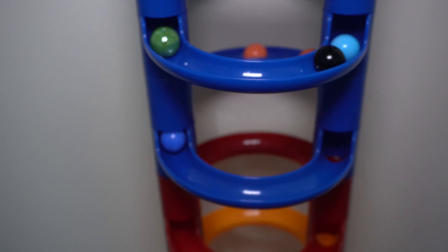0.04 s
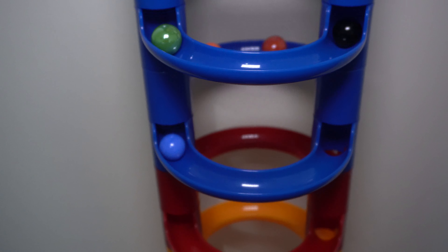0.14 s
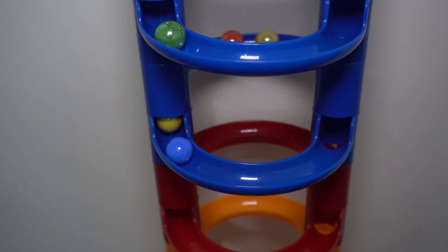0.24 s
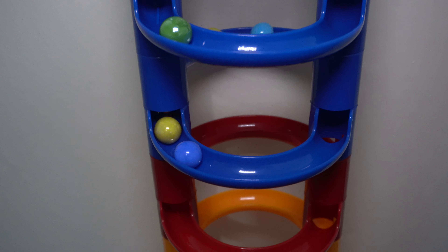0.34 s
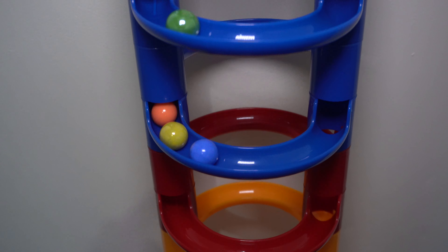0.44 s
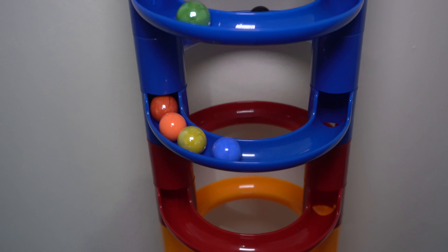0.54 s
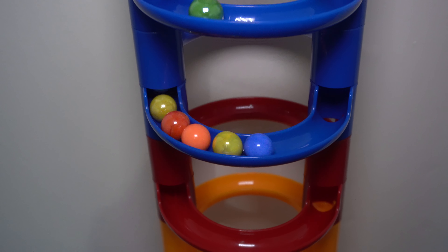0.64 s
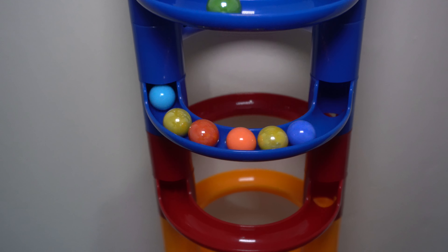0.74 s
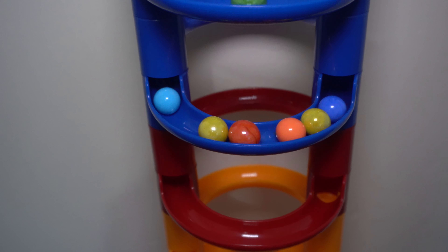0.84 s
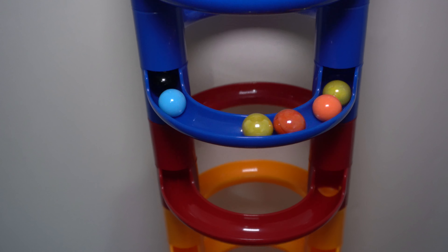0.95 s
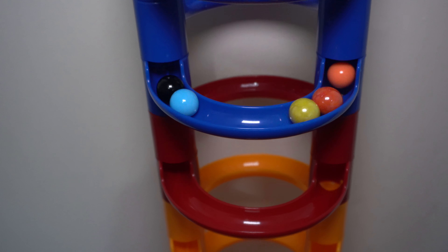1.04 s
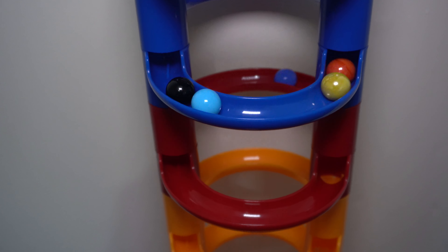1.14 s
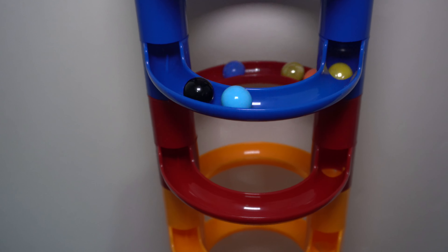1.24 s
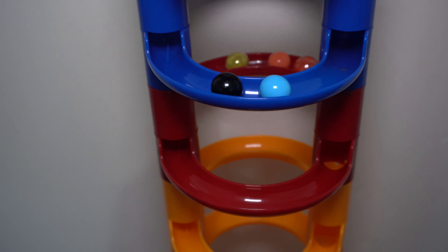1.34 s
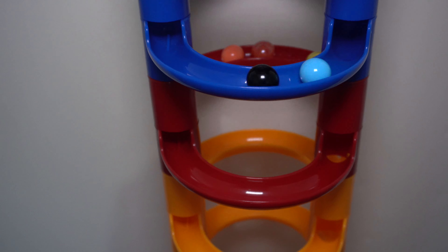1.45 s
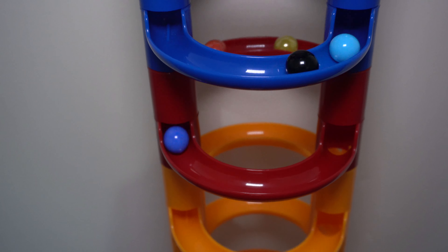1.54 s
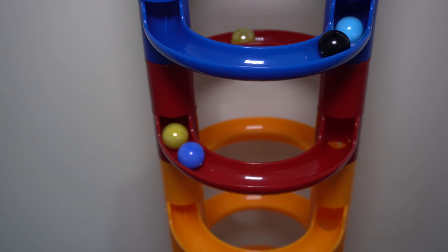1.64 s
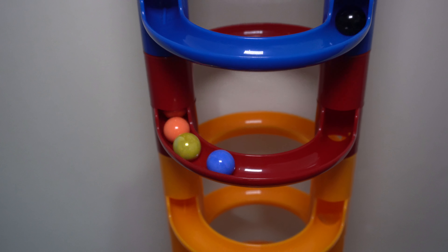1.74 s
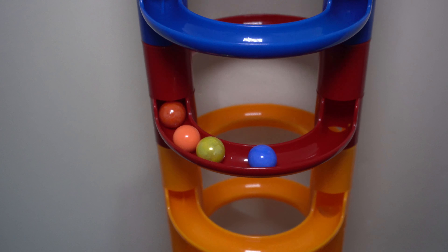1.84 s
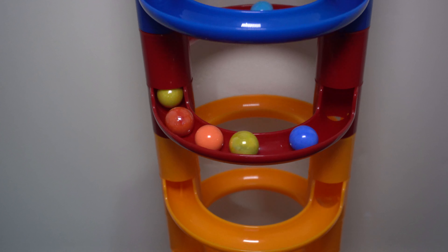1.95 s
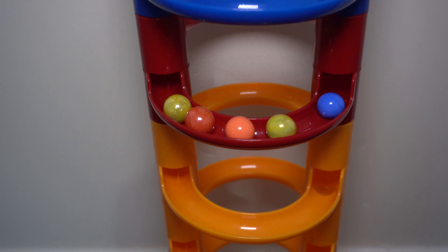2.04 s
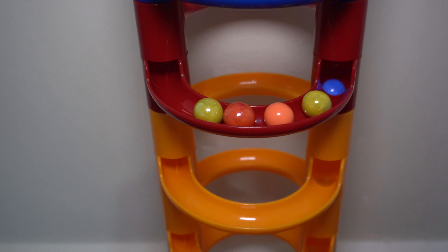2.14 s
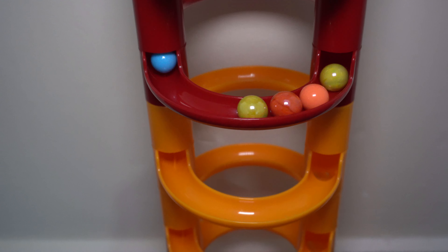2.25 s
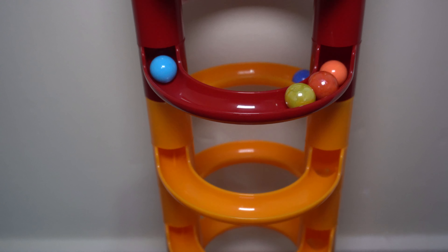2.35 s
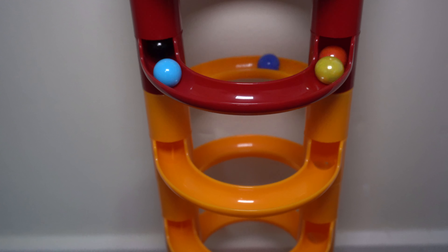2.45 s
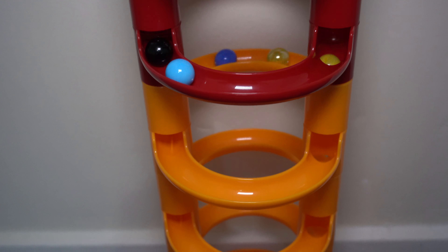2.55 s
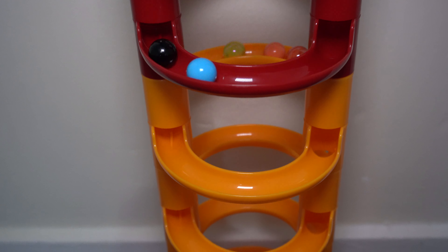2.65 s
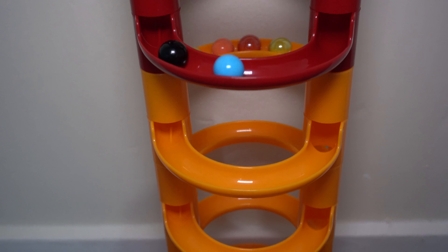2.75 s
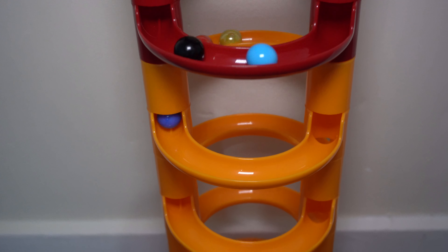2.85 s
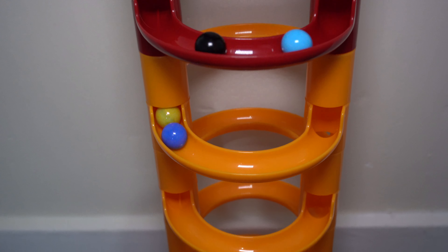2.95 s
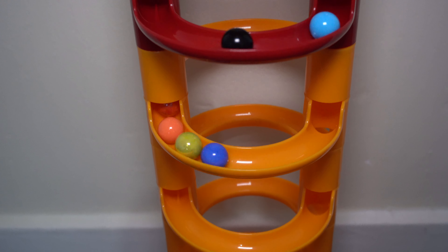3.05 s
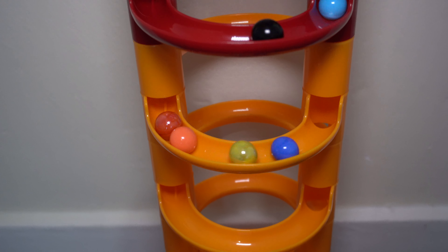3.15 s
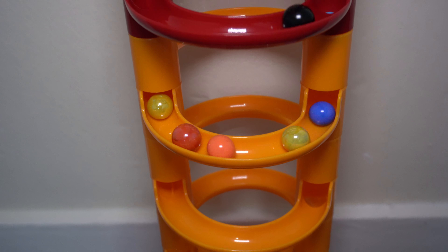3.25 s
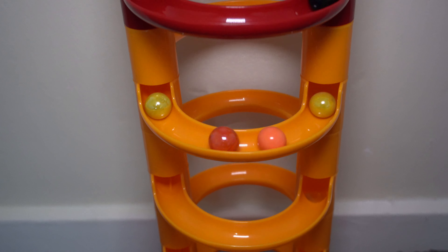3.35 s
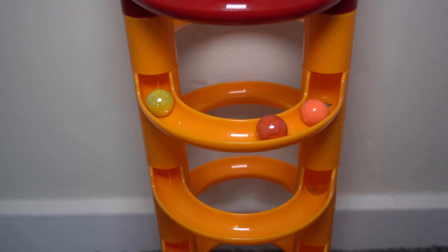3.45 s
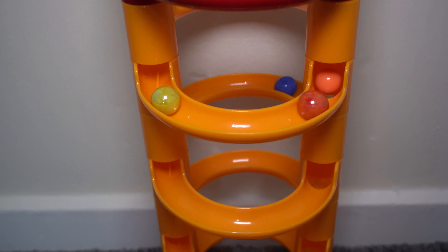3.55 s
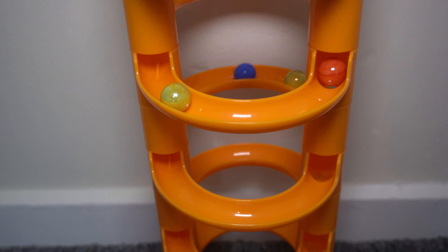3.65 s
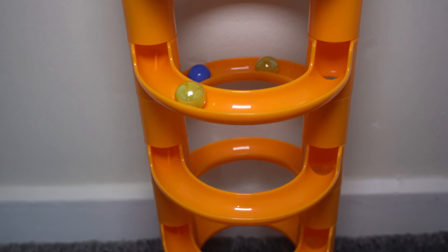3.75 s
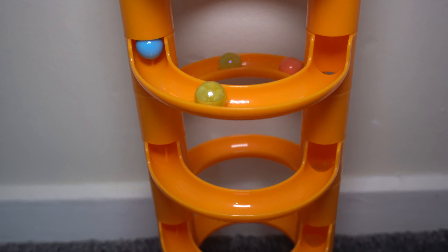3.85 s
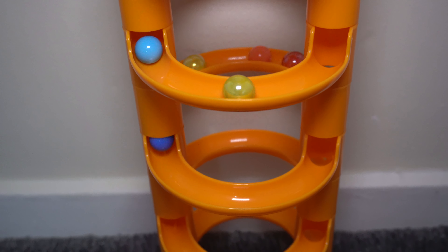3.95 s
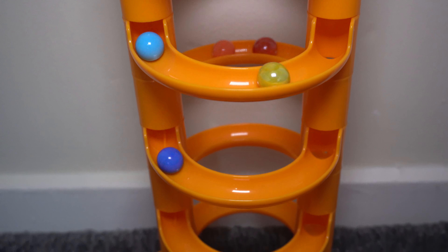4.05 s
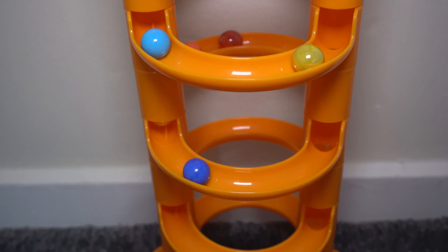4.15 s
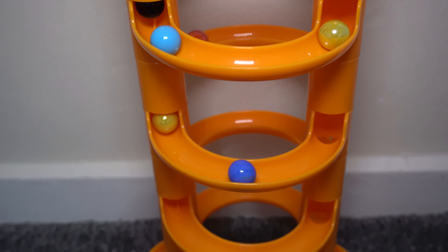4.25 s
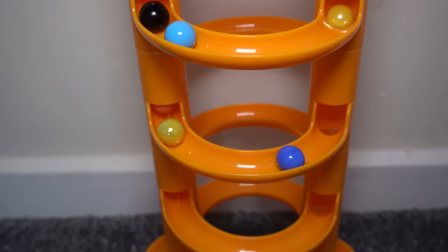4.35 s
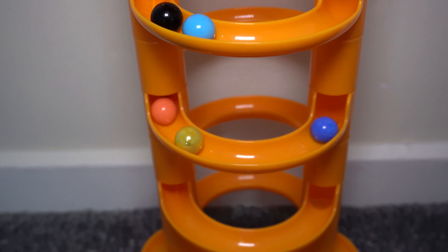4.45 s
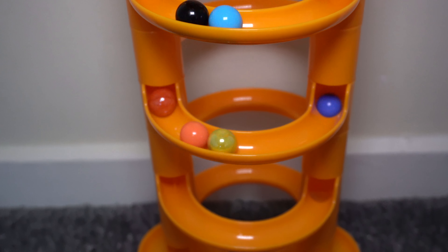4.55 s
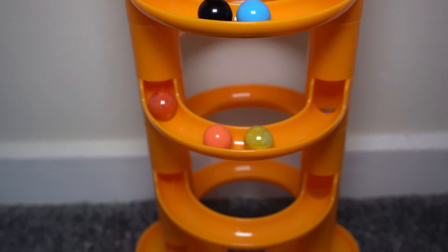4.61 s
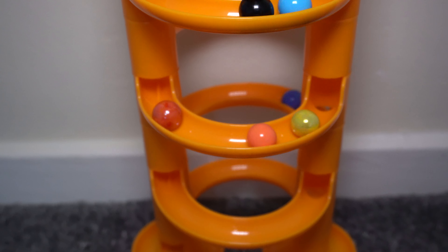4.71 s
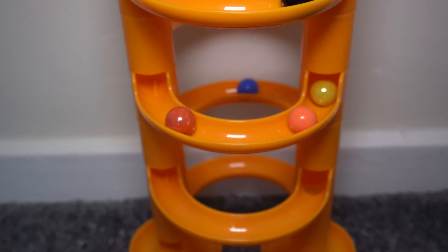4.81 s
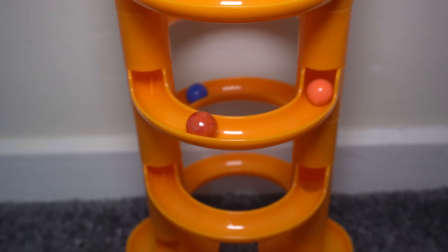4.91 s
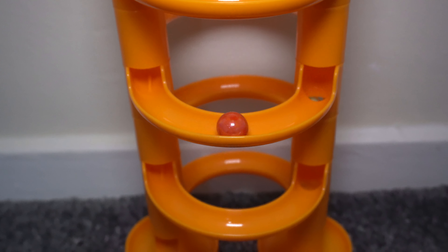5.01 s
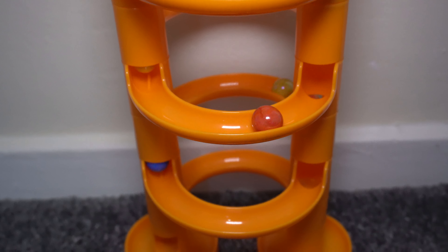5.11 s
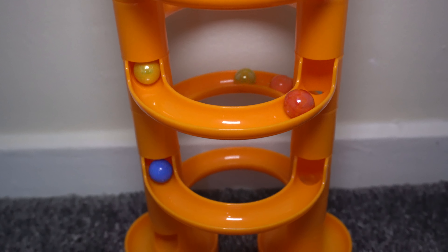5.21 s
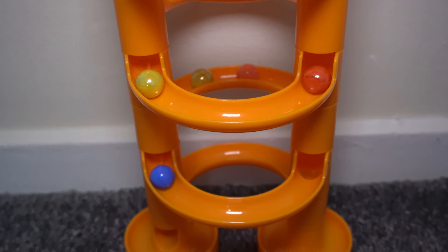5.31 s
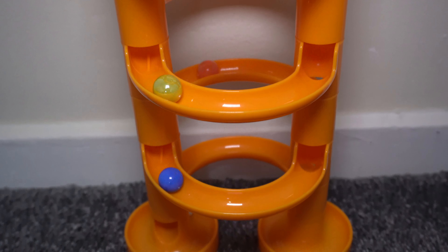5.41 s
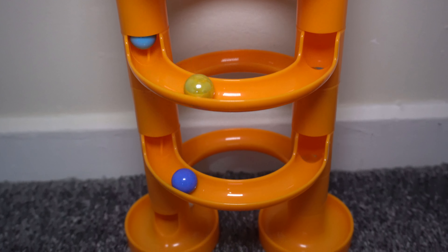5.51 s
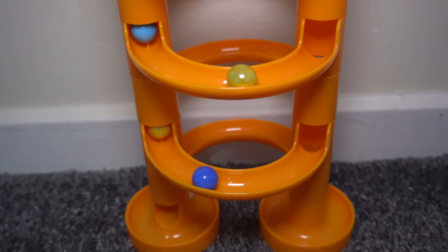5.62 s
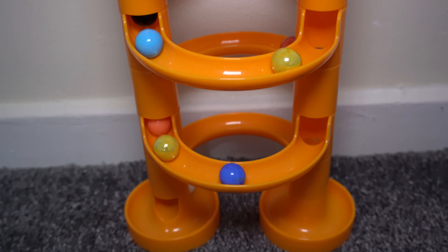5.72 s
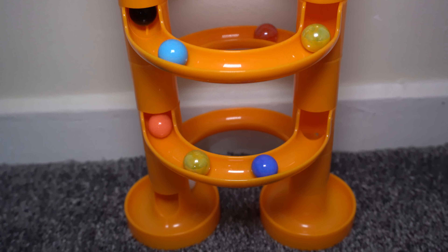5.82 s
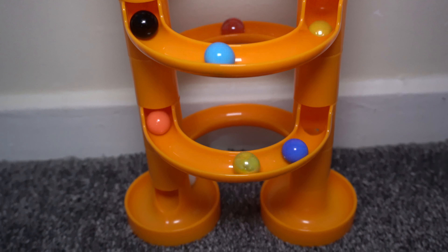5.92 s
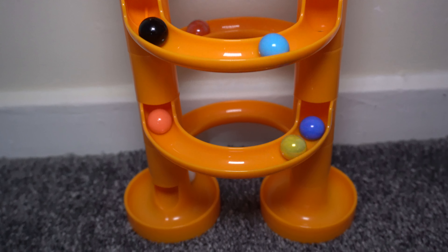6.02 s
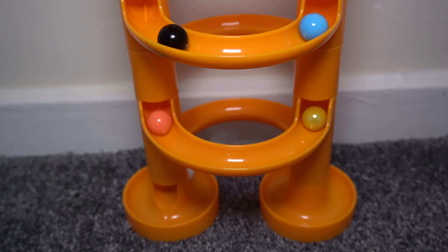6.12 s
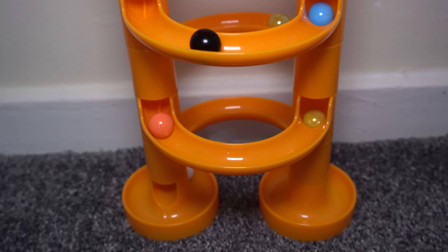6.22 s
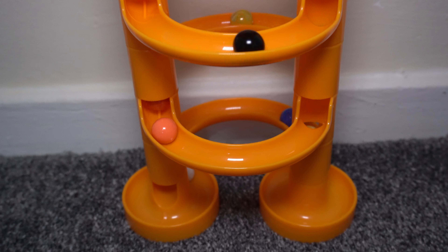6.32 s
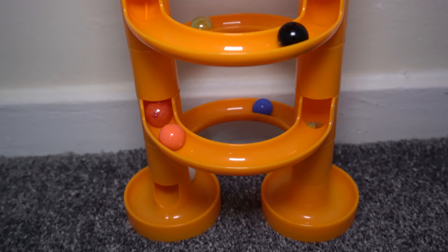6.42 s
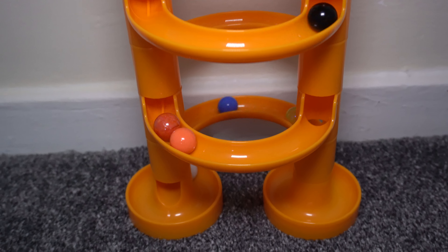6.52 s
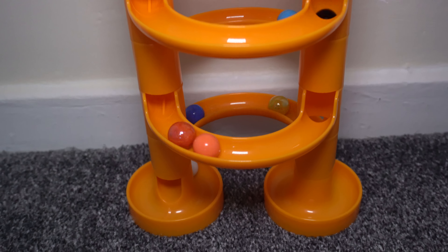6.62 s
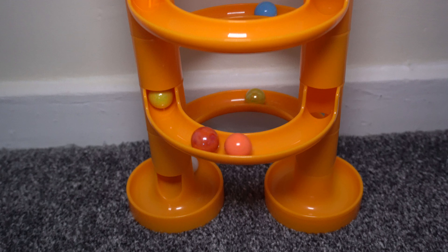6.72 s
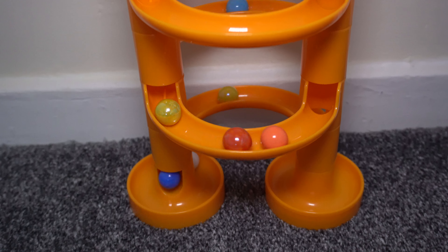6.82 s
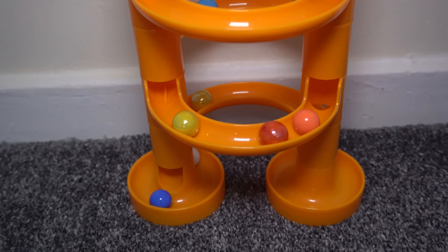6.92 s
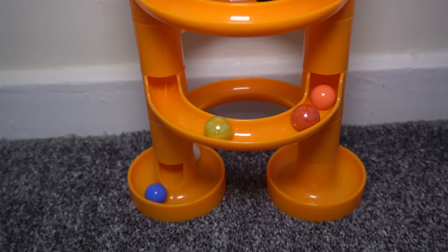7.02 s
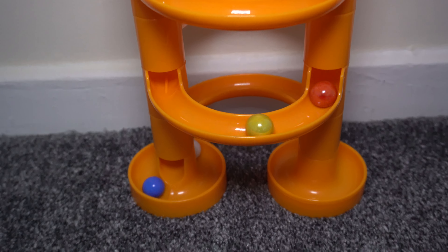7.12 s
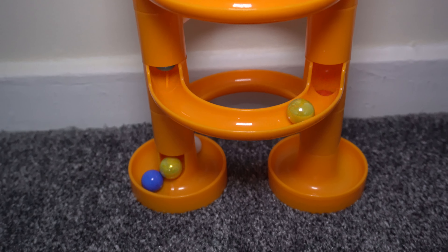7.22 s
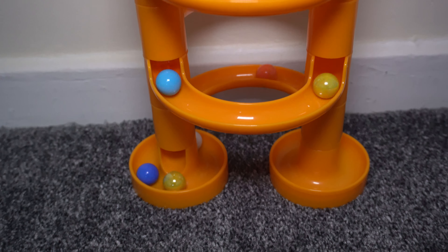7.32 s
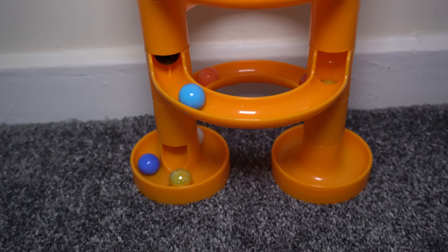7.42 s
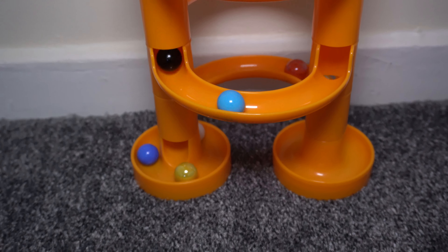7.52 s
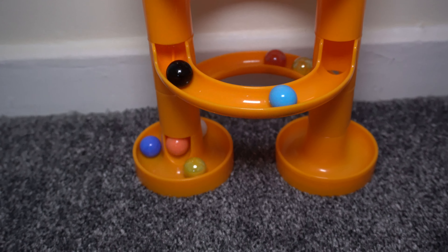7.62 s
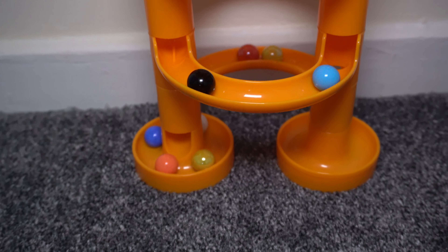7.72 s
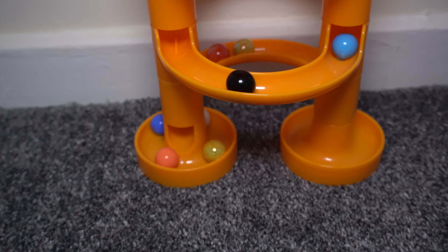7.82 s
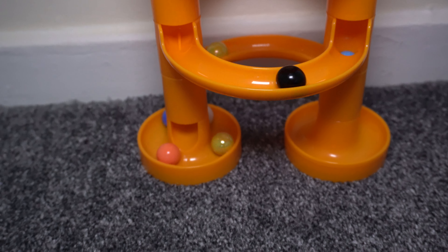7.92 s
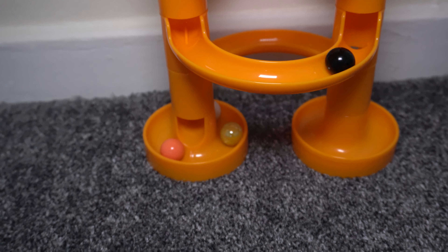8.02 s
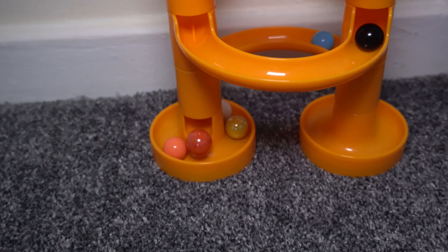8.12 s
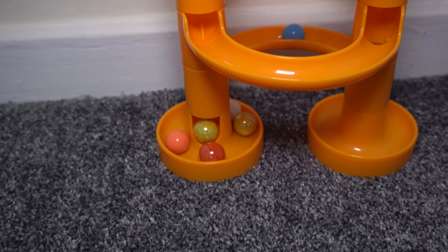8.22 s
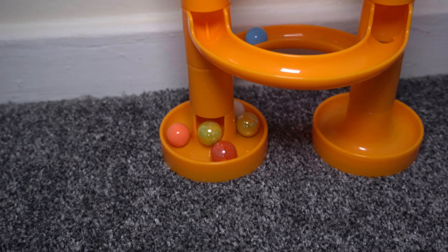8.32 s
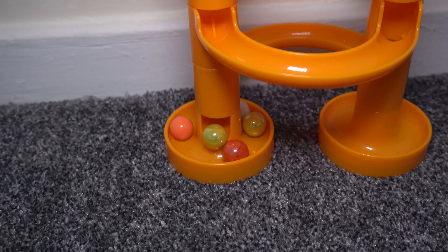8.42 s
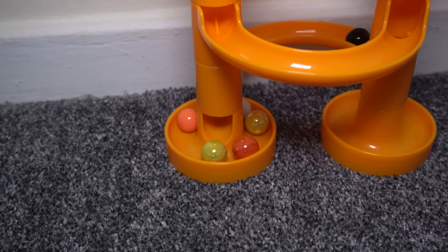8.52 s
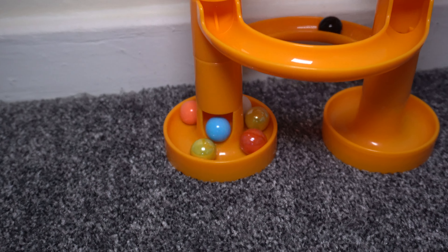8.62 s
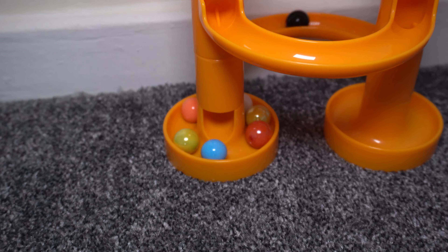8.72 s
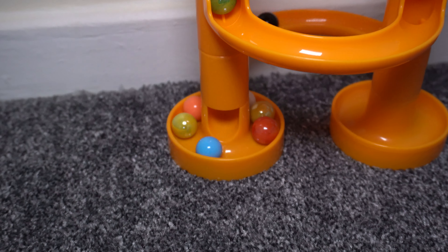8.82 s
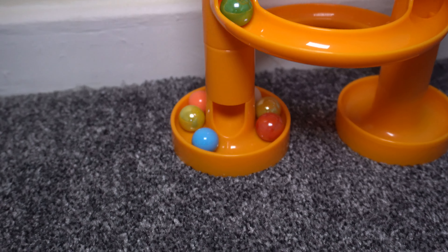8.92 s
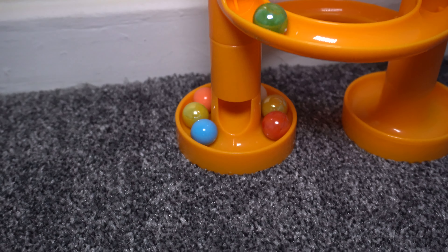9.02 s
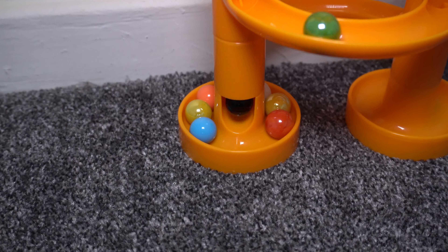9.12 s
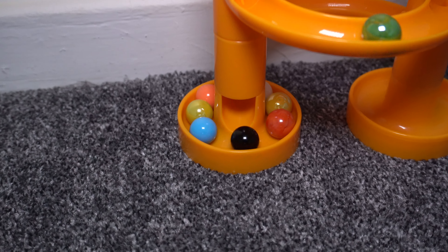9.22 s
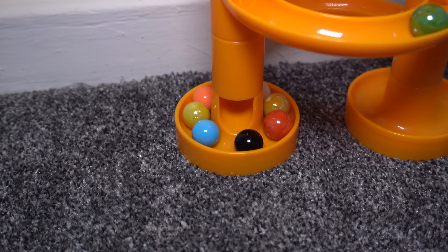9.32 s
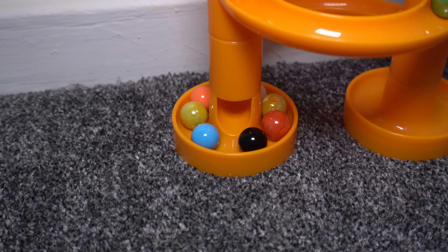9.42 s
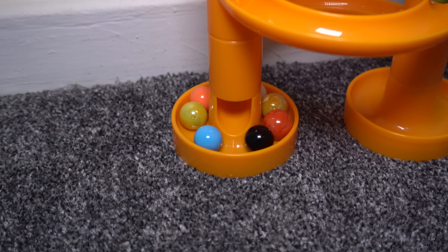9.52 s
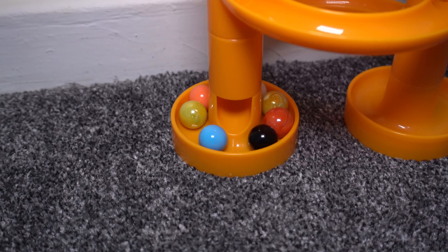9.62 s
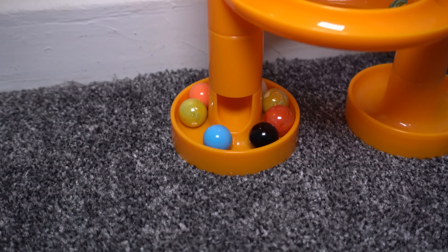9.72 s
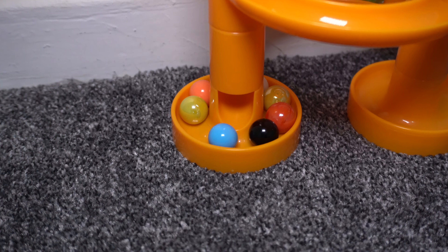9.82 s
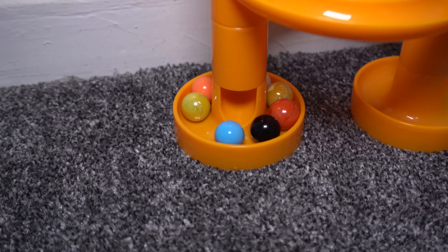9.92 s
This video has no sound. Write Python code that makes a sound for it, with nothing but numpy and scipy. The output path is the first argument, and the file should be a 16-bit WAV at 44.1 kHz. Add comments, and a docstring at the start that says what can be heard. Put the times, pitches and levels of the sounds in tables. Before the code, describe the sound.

Rapid glassy ticks and plastic knocks tumble on as marbles roll down a toy tower of stacked rings, its hollow posts humming softly beneath the rattle. The clatter gradually loses brightness on the way down. Near the end the marbles drop into a cup with light thuds and clinks, leaving a few scattered clicks. The small room adds a short echo and a faint low murmur of air.

```python
"""Glass marbles run down a stack of plastic rings in a small carpeted room. From the start they
knock against the track and each other, each impact exciting the modes of the plastic and a glassy tick.
Between knocks they roll with a rattle, and the air in the hollow posts hums. As they descend, the hum
deepens and the knocks grow duller; from about 7 s they thud and clink into a cup. Throughout, the room
echoes over a low murmur of air, and a limiter holds the peaks."""
import sys
import numpy as np
from scipy import signal
from scipy.fft import rfft, irfft
from scipy.io import wavfile
from scipy.ndimage import uniform_filter1d, minimum_filter1d

SR = 44100
rng = np.random.default_rng(int(sys.argv[2]) if len(sys.argv) > 2 else 0)


def transcribe(u):
    """Save the signal u as a 16-bit wav file named by the first command-line argument.

    u: samples, shape (n,) or (channels, n), limited to [-1, 1]; the rate is SR.
    q: integer samples, one column per channel.
    """
    v = np.clip(np.atleast_2d(u).T, -1, 1)
    q = np.round(v * 32767).astype(np.int16)
    wavfile.write(sys.argv[1], SR, q)


N = 439236

# impacts of the marbles: start_s, level_db, tick_re_blow_db
KNOCKS = [(0.0181, -1.5, -10), (0.03, -8, -3), (0.0433, -8, 2), (0.061, -3, -7), (0.0797, -20, -1),
          (0.093, -9, -7), (0.1033, -24, -7), (0.1117, -21, 5), (0.127, -4, -8), (0.138, -1, -5),
          (0.1463, -22, -4), (0.161, -16, 0), (0.1696, -5, -1.5), (0.215, -6, -2), (0.2305, -12, 4),
          (0.236, -8, -5), (0.2427, -11, 1), (0.251, -11, -3), (0.2573, -9, -7), (0.2661, -11, -1),
          (0.2929, -1, -9), (0.303, -4, -7), (0.3115, -18, 2), (0.3204, -20, 3), (0.3368, -19, -3),
          (0.3475, -3, -7), (0.3537, -4, -14), (0.3724, -23, 2), (0.383, -14, -3), (0.396, -8, 0),
          (0.408, -12, -4), (0.427, -3, -6), (0.4458, -12, 0), (0.468, -3.5, -3), (0.49, -10, -6),
          (0.504, -9, -3), (0.517, -7, -5), (0.5228, -12, 2), (0.5373, -2.5, -2), (0.571, -9, 0),
          (0.5887, -15, -3), (0.5977, -3, -3), (0.603, -18, 9), (0.6122, 4, -11), (0.6278, -7, 1),
          (0.6396, -2, -12), (0.653, -8, -1), (0.6614, -16, 4), (0.6784, -1, -2), (0.7122, -7, -5),
          (0.7182, -24, -9), (0.727, -0.5, -8), (0.7344, -20, -4), (0.7424, -18, 5), (0.7592, -23, -3),
          (0.7841, -2.5, -6), (0.7969, -7.5, -4), (0.8241, -12, -4), (0.8373, -10, -5), (0.856, -13, -4),
          (0.8697, -22, -7), (0.879, -31, -8), (0.9055, -2.5, -2), (0.9352, -1, -14), (0.941, -16.5, 6.5),
          (0.963, -19, -2), (0.986, -21, -4), (0.996, -6, -1), (1.025, 1, -3.5), (1.032, -6, -7),
          (1.0425, -13, -4), (1.0517, -7, -4), (1.0608, -10, 5), (1.0772, -7.5, 2.5), (1.092, -25, -5),
          (1.1124, -17, -1), (1.1258, -5, -5), (1.1402, -18, 8), (1.1505, -22, -4), (1.1746, -1.5, 1),
          (1.1823, -0.5, -18), (1.191, -14, -5), (1.203, -17, 2), (1.238, -0.5, -4), (1.2542, -17, 7),
          (1.2651, -2.5, -4.5), (1.2807, -8.5, -2), (1.298, -10, 3), (1.315, -0.5, -4), (1.324, -6, -1),
          (1.336, -6, -10), (1.346, -16, 5), (1.3627, -22, 2), (1.378, -10, 2), (1.393, -18, 2),
          (1.4037, -16, -2), (1.409, -18, -3), (1.418, -23, 1), (1.4413, -2, -5.5), (1.449, -27, -17),
          (1.4675, -26, 3), (1.477, -8, -9), (1.4903, -3, -1), (1.514, -20, 2), (1.5278, -12, -7),
          (1.5372, 2, -8.5), (1.559, -11, 5), (1.5723, -8, -13), (1.583, -3, -2), (1.5967, -10, 1),
          (1.6142, -1.5, -6), (1.6252, -11.5, 3), (1.6385, -11, -2), (1.6478, -11, -17), (1.6566, -9, -2),
          (1.673, -9, -1), (1.6898, -29, -6), (1.7056, -3, -2), (1.711, -6, -1), (1.7335, -3, 0),
          (1.743, -5, -3), (1.7583, -6, -2), (1.77, -0.5, -4.5), (1.782, -9, -2), (1.8035, -5, -2),
          (1.8226, -18, 2), (1.835, -17, 0), (1.855, 0, -6), (1.8656, -3, -4), (1.8796, -2, -5),
          (1.8877, -13, 0), (1.91, -2.5, -7), (1.9237, -14, -2), (1.9363, -22, -8), (1.9437, -15, -1),
          (1.9597, -1, -1.5), (1.98, -21, 1), (1.989, 1, -9), (2.0058, -10, 3), (2.0227, -1, -6),
          (2.0423, -30, -8), (2.058, -6, -4), (2.079, -23, -10), (2.0906, -5, 2.5), (2.101, -21, -15),
          (2.116, -2, -3.5), (2.1355, -12, -9), (2.157, -1, -6.5), (2.1957, -1, -3), (2.2037, 0, -1),
          (2.2286, 0, -4), (2.237, -5, -8), (2.243, -6, -9), (2.2557, -3, -5), (2.273, -2, -5.5),
          (2.297, -5, -4), (2.322, -9, -4), (2.334, -16, 0), (2.355, -8, 4), (2.3655, 0.5, -1.5),
          (2.3998, 0, -6), (2.41, -5, 1), (2.42, -8, 0), (2.4368, -7, -4), (2.4469, 3.5, -7),
          (2.4638, -11, 3), (2.473, -2, -2), (2.485, -4, -6), (2.5088, -4.5, -4), (2.524, -4, 0),
          (2.5386, -5, -2), (2.5514, -6.5, -2), (2.572, -6, -9), (2.5778, -11, -6), (2.5875, -5, -2),
          (2.6013, -2.5, -13), (2.611, -5.5, 2), (2.6303, -12, -5), (2.647, -5.5, -10), (2.6676, -22, 2),
          (2.6814, -15.5, -4), (2.7015, -21, -9), (2.71, -26, -9), (2.7496, -32, -5), (2.7575, -23, -8),
          (2.789, -20, -19), (2.8348, 1, -2), (2.867, 1, -5), (2.8868, -4, 0), (2.894, -18, -5),
          (2.9108, -3, -8), (2.92, -11, -2), (2.937, -17, 5), (2.943, -18, 3), (2.9525, -20, 9),
          (2.962, -6, -10), (2.968, -2, -10), (2.982, -7, -5), (2.9952, -4, -1), (3.0086, -16, 9),
          (3.0173, -7, 0), (3.0315, -2, -6), (3.0435, -4, -6), (3.0617, -6, 0), (3.072, -17, -3),
          (3.0787, -3, -5), (3.0863, -9, 0), (3.103, -8.5, 3.5), (3.1124, -4, -15), (3.124, -29, -3),
          (3.1558, -9, -15), (3.1652, -26, -10), (3.178, -9.5, -4), (3.2027, -34, -6), (3.2103, -32, 1),
          (3.22, -26, 2), (3.2306, -3, -4), (3.234, -5, -5), (3.2483, -6.5, -4), (3.2656, -1, -0.5),
          (3.2813, -6, -3), (3.2998, -8, -7), (3.3059, -17.5, 10), (3.3259, -13, -3), (3.34, -12, 0),
          (3.3504, -3, -0.5), (3.3705, -14, -7), (3.384, -10, -2), (3.3977, -13, -4), (3.4103, -8, -6),
          (3.42, -9, -9), (3.4316, -11, 0), (3.4525, 2.5, -1.5), (3.476, -6, -6), (3.485, -7, 0.5),
          (3.496, -3, -8), (3.513, -14, 5), (3.5247, -19, -2), (3.536, 0, -8), (3.5424, -3.5, -3),
          (3.5525, -15, -1), (3.572, -9, -2), (3.585, -17, 1), (3.606, -4, -8), (3.6163, -2, 1),
          (3.627, -2, -0.5), (3.6427, -6, -3), (3.6585, -1.5, -4), (3.6693, -14, -3), (3.6817, -13, 4),
          (3.6923, -18, -4), (3.6994, -8, -5), (3.7066, -15, -2), (3.7176, -6, -8), (3.7245, -16, -9),
          (3.733, -5, -1), (3.7388, -5, 0), (3.7492, -2.5, -9), (3.7552, -7, -1), (3.778, -14, -1),
          (3.7932, -25, -5), (3.8038, -7, -1), (3.821, -7, -9), (3.829, -14, -1), (3.84, -10, -3),
          (3.8481, -5, -3), (3.866, -4, -3), (3.8839, -2.5, -4), (3.9024, -27, -4), (3.908, -23, -3),
          (3.9338, -11, 9), (3.943, -9, -3), (3.9563, -6, -7), (3.964, -3.5, 3), (3.9793, -11, -5),
          (4.0004, -1, -9), (4.018, -12, 2), (4.0335, -3, -4.5), (4.0742, -11.5, -6), (4.156, -31, -6),
          (4.1816, -35, -8), (4.198, -18, -12), (4.2031, -5, -4), (4.2194, -10, -11), (4.2302, 3, -6.5),
          (4.2436, -5.5, 5), (4.259, -16, -2), (4.2696, -4, -4.5), (4.2776, -16, -3), (4.294, -14.5, 4),
          (4.3157, -25, 2), (4.3328, -1.5, -9), (4.3426, -29, -5), (4.369, -1, -0.5), (4.375, -10, 3),
          (4.3899, -25, -5), (4.4027, -2, -2), (4.4153, -8, -2), (4.4306, -26, 3), (4.44, -9, -3),
          (4.4503, -27, -6), (4.459, -23, -2), (4.473, -14, -7), (4.483, -12, -8), (4.489, -9, 1),
          (4.5062, 1, -2), (4.5167, -3, -2), (4.529, 0, -7), (4.5363, -8.5, -4), (4.5484, -3, 0),
          (4.5608, -4.5, -2), (4.5794, -4, -4), (4.592, -20, -1), (4.6015, -23, -3), (4.6116, -5, -1),
          (4.621, -21, 6), (4.6363, -7, -4), (4.6488, -8, -7), (4.6675, -15, -6), (4.6867, 1, -4),
          (4.6996, -7, -6), (4.7173, -7, -2), (4.8257, -35, -15), (4.8729, -20, -16), (4.911, 2, -0.5),
          (4.938, -5, -1), (4.9544, -2.5, -9), (4.959, -7, -4), (4.9736, -9, -3), (4.979, -12, 5),
          (4.9986, -4, -4), (5.01, -7.5, -1), (5.0282, -8, -1.5), (5.0362, -20, -3), (5.0436, -10, -3),
          (5.0542, -7, 1), (5.064, -7, -1), (5.0708, -5, -1), (5.085, -12, -3), (5.099, -11, -4),
          (5.1102, -13, -2), (5.135, -7, 2), (5.141, -5, -1), (5.151, -12, -5), (5.1561, -8, -2),
          (5.161, -8, -3), (5.1737, -7, -4), (5.1895, 0, -2), (5.205, -5, 0), (5.211, -10, -1),
          (5.2295, -1, -8), (5.2586, -18, 1), (5.2658, -8, -1), (5.2738, -6, -13), (5.282, -11, -5),
          (5.2937, -11, -3), (5.302, -16, -11), (5.3122, -7, -5), (5.3256, -3, 4), (5.3389, -18, -6),
          (5.3541, -1, -2), (5.367, -28, -6), (5.3777, -19, 8), (5.401, 1, -7), (5.449, 0, -3),
          (5.4682, -18, -7), (5.476, -9, -5), (5.482, -7, -1), (5.4878, -9, -4), (5.502, -6, 2),
          (5.5181, -14, -3), (5.5356, -1, -2), (5.5408, -6, -5), (5.5509, -3, -1), (5.5612, -18, 4),
          (5.5688, 0, -3), (5.5852, -8, -4), (5.5946, -12, 3), (5.6069, -5, -13), (5.612, -22, -6),
          (5.626, -20, 8), (5.6325, -21, -7), (5.6543, 1.5, -6), (5.671, -15, -6), (5.686, -18, -7),
          (5.6947, -8, 7), (5.706, -5, -4), (5.718, -10, 7), (5.7454, -3, 0), (5.7696, -22, -2),
          (5.7774, -5, -1), (5.786, -9, -6), (5.7966, -7, 2), (5.813, -22, 0), (5.8164, -16, -2),
          (5.8281, -0.5, -6), (5.8461, -32, -9), (5.8634, -1, 1.5), (5.8703, -6, 1.5), (5.8788, -2, -7),
          (5.8857, -11.5, 6), (5.901, -18, -6), (5.9116, -11, 2), (5.9258, -28, -11), (5.942, -15, 1),
          (5.957, -11, -12), (5.964, -2, 1), (5.9906, -27, -6), (5.997, -4.5, -3.5), (6.0173, -18, 5),
          (6.046, -10.5, 5.5), (6.0582, -5, -6.5), (6.0754, -29, -5), (6.0946, -6, -5), (6.1007, -7, -2),
          (6.1077, -37, -5), (6.1292, -6, -2), (6.173, -5, 1), (6.1864, -29, -11), (6.1972, -7.5, -5),
          (6.2228, -5, -1.5), (6.2302, -11, -10), (6.2423, -14, 0), (6.2689, -4.5, 0.5), (6.2838, -7, -6),
          (6.2959, 2, 0), (6.3061, -2.5, -3), (6.322, -8, 4), (6.33, -5, -1), (6.3453, -12, -2),
          (6.3516, -16, -2), (6.36, -6, -1), (6.3673, -10, -4), (6.3804, -2, -3), (6.4045, -3.5, -2.5),
          (6.4177, -9.5, -6), (6.4255, -9, -4), (6.4377, -14, -1), (6.4486, -16, -4), (6.4739, -12, -2.5),
          (6.4947, -25, -12), (6.5361, -40, -13), (6.5945, -43, 5), (6.6012, -24, -14), (6.616, -23, -24),
          (6.6306, -23, -13), (6.6605, -1, 0.5), (6.6721, -7, 3), (6.691, -3, -5), (6.7054, 0.5, -1),
          (6.7116, -10, -1), (6.733, -6, -4), (6.746, -3, -6), (6.752, -17, -2), (6.766, -11, -1),
          (6.7785, -5.5, -5), (6.7921, -7, 1), (6.8086, -16, -4), (6.8175, -21, -13), (6.8243, -8, -4),
          (6.8328, -1, -1), (6.862, -7.5, -1), (6.868, -4.5, -2), (6.934, -2, 1), (6.9437, -13, -2),
          (6.9698, -9, -6), (6.978, -9.5, -8), (6.9903, -23, 6), (7.009, -17, -7), (7.0282, -23, -9),
          (7.0722, -2, 1.5), (7.1007, -4.5, 3.5), (7.11, -6, -5), (7.127, -13, 0), (7.143, -4, 0),
          (7.1647, -5, -6), (7.1724, -9, 6.5), (7.194, -10, 0), (7.2008, -9, 1), (7.2148, -1, -2),
          (7.2241, -4, 1), (7.2358, -24, -4), (7.2477, -5, 2), (7.2644, -5, 3), (7.27, -9, -1),
          (7.2818, -4, 0), (7.2866, -4, 4.5), (7.2992, -4, -9), (7.3107, -10, -1), (7.324, -18, 2),
          (7.3448, 2, -3.5), (7.356, -7.5, 4), (7.363, -14, 4), (7.3942, -11, 2), (7.4077, -13, -11),
          (7.4134, -16, -8), (7.4267, -1, 1), (7.443, -20, -4), (7.4587, -2.5, -1.5), (7.482, -18, 9),
          (7.489, -8, -7), (7.5119, -9, 0.5), (7.527, -3, -11), (7.565, -12, -1), (7.5747, -9, -13),
          (7.5844, -25, -10), (7.5935, -0.5, 0.5), (7.6108, -1, -6), (7.6165, -15, -14), (7.631, -8, -4),
          (7.6535, -1, 2.5), (7.668, -12, 0), (7.6864, -14, 0), (7.7076, -7, -2), (7.7525, -9, 8),
          (7.7819, -9.5, -1), (7.7956, -27, 11), (7.866, -25, -6), (7.8809, -44, -10), (7.908, -6.5, 6),
          (7.9354, -14, 7), (7.9453, -6, -5), (7.9501, -7.5, 2), (7.9675, -9.5, -3), (7.99, -11, 0),
          (8.0165, -9, -8), (8.0228, -8, 3.5), (8.0384, -14, -5), (8.0499, -1, -2.5), (8.0577, -22, -5),
          (8.0644, -8, 0), (8.078, -17, -8), (8.0912, -5, -2), (8.1264, -2.5, -2.5), (8.14, -8, -5),
          (8.1662, -16, -3), (8.174, -16, 9), (8.1837, -12, -13), (8.194, -3, 2), (8.2023, -10, -6),
          (8.2107, -7, 7), (8.2206, -2, 0), (8.227, -18, -2), (8.2412, -9.5, 0), (8.2762, -12.5, 2.5),
          (8.2895, -24, 9), (8.2988, -23, 8), (8.3115, -16, -10), (8.3347, -5, -12), (8.3668, -30, -5),
          (8.379, -24, 3), (8.388, -7, -30), (8.4, -35, -17), (8.4249, -11.5, -5), (8.4483, -31, -21),
          (8.4577, -5, -0.5), (8.47, -20, -12), (8.5119, -40, -10), (8.552, -27, -25), (8.5732, -14, 0),
          (8.582, -9, -3), (8.591, -4, 4), (8.614, -9, -2), (8.623, -15, 10), (8.627, -3, -2.5),
          (8.6504, -14, -5), (8.6608, -12, 2), (8.6795, -7.5, 0), (8.6925, -14, -1), (8.7334, -22, 0),
          (8.759, -42, -2), (8.781, -11, 3), (8.7906, -2.5, 3), (8.807, -26, -2), (8.8227, -3, 1),
          (8.8451, -7, 1), (8.8693, -6.5, -1), (8.903, -22, 11), (8.9121, -29, -2), (8.9216, -5, -2.5),
          (8.949, -3.5, -5.5), (8.9658, -18, 2), (8.9717, -22, -13), (9.0618, -33, -18), (9.072, -26, -31),
          (9.1003, -49, 8), (9.1255, -3, -1), (9.1532, -5.5, -1), (9.1681, -22, -6), (9.185, -25, -6),
          (9.201, -26, -1), (9.2177, -4, -2), (9.2295, -22, -6), (9.243, -29, -6), (9.2648, -10, 4),
          (9.2701, -6.5, 4), (9.28, -17, -9), (9.2855, -15, 6), (9.304, -27, 3), (9.326, -39, 12),
          (9.405, -31.5, -3), (9.423, -48, -3), (9.434, -29, -10), (9.4784, -39, -8), (9.5147, -22, -15),
          (9.5288, -25, -24), (9.537, -52, -16), (9.5696, -2, 0), (9.5827, -30, -6), (9.603, -9.5, -1.5),
          (9.6113, -17, -5), (9.633, -12.5, -3), (9.6507, -20, -1), (9.672, -6, -2), (9.686, -33, -11),
          (9.717, -3.5, 1), (9.73, -22, -8), (9.748, -31, -6), (9.8974, -27, -22)]
# modes of the plastic track: pitch_hz, level_db, t60_s (held to 4-40 ms in use)
TRACK_MODES = [(546, -20.5, 0.047), (760, -9, 0.012), (1030, -17.5, 0.0097), (1720, -11, 0.057),
               (1742, 2, 0.045), (1918, 7, 0.018), (2147, -1.5, 0.0079), (2434, 4, .05), (2746, -2, 0.12),
               (3190, 9, 0.056), (3360, 4, 0.03), (3465, 5, 0.03), (4404, 5.5, 0.0039), (4832, 4.5, 0.022),
               (5437, 5, 0.041), (6700, -25, 0.04), (7900, -4.5, 0.052)]
# weighting of a knock, which moves the deep modes less: frequency_hz, gain_db
KNOCK_SPECTRUM = [(300, -3), (1100, -5.5), (1600, -2.5)]
# tick of the glass: frequency_hz, gain_db
TICK_SPECTRUM = [(1500, -7.5), (3000, 8), (6000, 1), (8000, -3.5), (10000, -10), (12500, -11), (15500, -14)]
# timbre on the way down: time_s, post_pitch_hz, base_re_posts_db, knock_treble_db
DESCENT = [(0, 705, -38, 5), (1.2, 693, -28, 3), (3, 683, -7, 1), (4.3, 674, -9, 0.5), (6, 646, -4.5, -3),
           (7.8, 638, -2, -4), (8.5, 618, -9, -5), (9.96, 608, 0, -10)]
# runs of marbles at full speed: start_s, end_s, rattle_db, hum_db
RUNS = [(0.005, 0.155, -24, -44), (0.253, 0.495, -30, -46), (0.57, 0.72, -26.5, -38.5),
        (1.035, 1.19, -23, -36.5), (1.29, 2.652, -28, -39.5), (2.876, 4.002, -29, -39.5),
        (4.24, 4.695, -31.5, -40), (4.983, 5.033, -27.5, -41), (5.14, 6.41, -30, -41),
        (6.755, 6.806, -26.5, -37.5), (6.95, 6.982, -33, -54), (7.232, 7.386, -25, -36.5),
        (7.413, 7.69, -34, -45.5), (8.05, 8.277, -32.5, -40), (8.64, 8.918, -43, -45.5),
        (9.198, 9.26, -52, -46), (9.698, 9.746, -37, -44)]
# broadband part of the rattle: frequency_hz, gain_db
RATTLE_SPECTRUM = [(200, -31.5), (1000, -17), (3000, -2.5), (6000, -5), (9000, -35), (15500, -44)]
# steady rolling, duller than skittering: frequency_hz, gain_db
STEADY_SPECTRUM = [(3000, 4), (5500, -9), (8000, -3.5), (15500, -15)]
# landings and clinks in the cup: start_s, thud_db, ring_db
LANDINGS = [(6.931, -17.5, -26), (7.072, -40, -22), (7.7525, -26.5, 0), (7.782, -38, -14), (7.908, -40, -3),
            (7.99, -42, -17), (8.023, -40, -24), (8.208, -22, -22), (8.458, -39, -21), (8.572, -23, -28),
            (8.79, -40, -24), (9.266, -24.5, -26)]
# hollow thud of the cup: frequency_hz, gain_db
THUD_SPECTRUM = [(200, -24), (400, -5.5), (700, -1.5), (1200, -5.5), (1800, -3.5), (4000, -46)]
# modes of the cup: pitch_hz, level_db, t60_s
CUP_MODES = [(3550, -1, .024), (4740, 0, .032), (5830, -5, .028), (7900, -11, .02), (9850, -8, .025)]
# reverberation time of the room: frequency_hz, t60_s
ROOM_DECAY = [(250, 0.43), (700, 0.97), (1900, 0.6), (4600, 0.29), (9000, 0.45), (15000, 0.074)]
# dulling of the echoes by the soft floor: frequency_hz, gain_db
CARPET_SPECTRUM = [(2000, 0.5), (5000, -13), (8000, -7), (15000, -5.5)]
# murmur of the air: frequency_hz, gain_db
AIR_SPECTRUM = [(15, -41), (25, 6), (59, 6), (75, 6), (135, 13.5), (172, 9.5), (220, -5), (290, -38),
                (480, -120)]
# low drone that comes and goes: time_s, level_db
DRONE_LEVELS = [(0.6, -91), (1.692, -58), (2.266, -75), (2.3, -79)]


def knocks(size=4096):
    """Impact excitation: each contact chatters into the track's modes, and the glass adds a tick."""
    chatter_s, swell_s = 0.0036, 0.0012
    start_s, blow_db, tick_db = np.transpose(KNOCKS)[..., None]
    t, hz = np.arange(size) / SR, np.fft.rfftfreq(size, 1 / SR)
    spot = rng.standard_normal((len(start_s), len(TRACK_MODES), 2))
    grit, fizz = np.moveaxis(rng.standard_normal((len(start_s), 2, size)), 1, 0)
    chatter = np.exp(-t / chatter_s)
    force = grit * (chatter * (1 - np.exp(-t / swell_s)) + .5 * np.exp(-t / 0.00046))
    response = track_response(hz, spread_db=2.2, detune=.006, spot=spot)
    # harder contacts excite the upper modes
    hardness = gain_of(1.14 * tick_db * np.clip(np.log2((hz + 1) / 3000), 0, 2.4))
    treble_db = per_sample(DESCENT)[2][(start_s * SR).astype(int)]
    shelf_db = treble_db / (1 + (3700 / (hz + 1)) ** 12)  # acts above 3700 Hz
    weighting = gain_of(shelf_db + at_frequency(KNOCK_SPECTRUM, hz))
    body = irfft(rfft(force) * response * hardness * weighting, size)
    body *= np.cos(np.pi / 2 * t * SR / size) ** 2
    # each tick favours one pitch of its own, between 7170 and 13400 Hz
    ring_hz = 7170 * (13400 / 7170) ** rng.random((len(start_s), 1))
    ring_db = 12.5 / (1 + ((hz - ring_hz) / 220) ** 2)
    tick = irfft(rfft(coloured(fizz, TICK_SPECTRUM)) * gain_of(0.98 * shelf_db + ring_db), size)
    tick *= (1 - np.exp(-t / 0.00034)) * (np.exp(-t / 0.0019) + 0.22 * chatter)
    sounds = gain_of(blow_db) * (even_onset(body) + gain_of(tick_db) * even_onset(tick))
    out = np.zeros(N)
    for at_s, sound in zip(start_s[:, 0], sounds):
        add(out, at_s, sound)
    return out


def track_response(hz, spread_db=0., detune=0., spot=np.zeros((1, len(TRACK_MODES), 2))):
    """Modal superposition: damped resonances sum, each weighted and detuned by the spot struck."""
    out = 0
    for k, (mode_hz, level_db, t60_s) in enumerate(TRACK_MODES):
        tuned_hz = mode_hz * (1 + detune * spot[:, k, :1])
        width_hz = np.log(1000) / (np.pi * np.clip(t60_s, .004, .04))
        resonance = 1j * width_hz * hz / (tuned_hz ** 2 - hz ** 2 + 1j * width_hz * hz)
        out = out + gain_of(level_db + spread_db * spot[:, k, 1:]) * resonance
    return out


def rolling(rattle_db, jolts):
    """Random excitation: small skips ring the track; a knocked marble skitters, then settles."""
    skips_per_s, skip_s, settle_s = 400, .004, 0.026
    skips = gain_of(1.5 * np.minimum(rng.exponential(1, N), 3)) * (rng.random(N) < skips_per_s / SR)
    load = .6 + signal.lfilter([1], [1, -np.exp(-1 / (skip_s * SR))], skips)
    force = load * rng.standard_normal(N)
    ringing = irfft(rfft(force) * track_response(np.fft.rfftfreq(N, 1 / SR))[0], N)
    rattle = unit_rms(ringing) + gain_of(1.5) * unit_rms(coloured(force, RATTLE_SPECTRUM))
    steady = gain_of(rattle_db) * unit_rms(coloured(rattle, STEADY_SPECTRUM))
    skitter = signal.lfilter([.06], [1, -np.exp(-1 / (settle_s * SR))], jolts)
    return steady + skitter * unit_rms(rattle)


def tower_hum(hum_db, jolts):
    """Forced resonance: rolling and knocks shake the tower, so the air in the posts and the base hum."""
    post_hz, base_db, _ = per_sample(DESCENT)
    shake = rng.standard_normal(N) + .25 * unit_rms(jolts * rng.choice([-1., 1.], N))
    posts = resonate(shake, post_hz, pole_width_hz=68)
    base = resonate(shake, pitch_hz=321, pole_width_hz=64)
    return gain_of(hum_db) * (posts + gain_of(base_db) * base)


def knock_impulses():
    """Impulse approximation: each knock is a jolt one sample long."""
    start_s, blow_db, _ = np.transpose(KNOCKS)
    jolts = np.zeros(N)
    jolts[(start_s * SR).astype(int)] = gain_of(blow_db)
    return jolts


def run_levels():
    """Exponential growth and decay: rattle and hum build as a run gathers speed, hold, then settle."""
    start_s, end_s, rattle_db, hum_db = np.transpose(RUNS)[..., None]
    t = np.arange(0, N / SR + .01, .005)
    drop_db = -128 * np.maximum(start_s - t, 0) - 131 * np.maximum(t - end_s, 0)
    linger_db = -16.5 - 8 * (t - end_s)  # the fast decay gives way to a slow one
    fade_db = np.where(t > end_s, np.maximum(drop_db, linger_db), drop_db)
    levels = (rattle_db + fade_db).max(axis=0), (hum_db + 0.84 * fade_db).max(axis=0)
    return [np.interp(np.arange(N) / SR, t, level) for level in levels]


def landings(size=8192):
    """Free vibration: the cup thuds as a marble drops in, and rings as glass meets glass in it."""
    out, t = np.zeros(N), np.arange(size) / SR
    pitch_hz, level_db, t60_s = np.transpose(CUP_MODES)[..., None]
    for start_s, thud_db, ring_db in LANDINGS:
        noise = unit_rms(coloured(rng.standard_normal(size), THUD_SPECTRUM))
        thud = noise * (1 - np.exp(-t / 0.0012)) * np.exp(-t / 0.021)
        phase = 2 * np.pi * (pitch_hz * t + rng.random(pitch_hz.shape))
        modes = gain_of(level_db - 60 * t / t60_s) * np.sin(phase)
        ring = (1 - np.exp(-t / .002)) ** 2 * modes.sum(axis=0)
        add(out, start_s, gain_of(thud_db) * thud + gain_of(ring_db) * ring)
    return out


def room(x, tails=3):
    """Reverberation: sparse reflections die away, their pattern changing as the marbles move on."""
    out, t = np.zeros(N), np.arange(N) / SR
    for k in range(tails):
        echoes = np.zeros(SR // 2)
        slots = np.arange(130, len(echoes) - 20, 20)
        echoes[slots + rng.integers(0, 20, len(slots))] = rng.choice([-1., 1.], len(slots))
        echoes *= 1 + 3.9 * np.exp(-np.arange(len(echoes)) / (0.042 * SR))  # strong off the near wall
        hz, lag_s, spectra = signal.stft(echoes, SR, nperseg=256)
        decay = gain_of(-60 * lag_s / at_frequency(ROOM_DECAY, hz)[:, None])
        tail = signal.istft(spectra * decay, SR, nperseg=256)[1]
        crossfade = np.sqrt(2 / tails) * np.cos(np.pi * (9 * t + k / tails))
        out += signal.oaconvolve(x * crossfade, tail / np.linalg.norm(tail))[:N]
    return coloured(out, CARPET_SPECTRUM)


def background(air_db=-65, drone_hz=43.1):
    """Ambient noise: a low murmur of air, with a pure tone that swells and fades early on."""
    air = gain_of(air_db) * unit_rms(coloured(rng.standard_normal(N), AIR_SPECTRUM))
    t = np.arange(N) / SR
    drone_db = np.interp(t, *np.transpose(DRONE_LEVELS), left=-120, right=-120)
    return air + gain_of(drone_db) * np.sqrt(2) * np.sin(2 * np.pi * drone_hz * t)


def resonate(x, pitch_hz, pole_width_hz):
    """Heterodyne resonator: shifts the pitch down to zero, smooths twice, and shifts back."""
    carrier = np.exp(2j * np.pi * np.cumsum(pitch_hz * np.ones(N)) / SR)
    pole = np.exp(-np.pi * pole_width_hz / SR)
    return unit_rms((carrier * signal.lfilter([1], [1, -2 * pole, pole ** 2], x / carrier)).real)


def gain_of(db):
    return 10 ** (np.asarray(db) / 20)


def unit_rms(x):
    return x / np.sqrt(np.mean(x ** 2, axis=-1, keepdims=True) + 1e-20)


def even_onset(x):
    """Normalisation: every row gets the same power in its first 7 ms."""
    return x / np.sqrt(11.8 * (x[:, :300] ** 2).mean(axis=1, keepdims=True))


def at_frequency(points, hz):
    point_hz, value = np.transpose(points)
    return np.interp(np.log(hz + 1), np.log(point_hz + 1), value)


def per_sample(rows):
    time_s, *columns = np.transpose(rows)
    return [np.interp(np.arange(N) / SR, time_s, column) for column in columns]


def add(mix, start_s, sound):
    part = mix[round(start_s * SR):][:len(sound)]
    part += sound[:len(part)]


def coloured(x, spectrum):
    hz = np.fft.rfftfreq(x.shape[-1], 1 / SR)
    return irfft(rfft(x) * gain_of(at_frequency(spectrum, hz)), x.shape[-1])


def scene():
    """Superposition: direct sound, reflections and background add; a small toy radiates no bass."""
    rattle_db, hum_db = run_levels()
    jolts = knock_impulses()
    marbles = knocks() + rolling(rattle_db, jolts) + tower_hum(hum_db, jolts) + landings()
    direct = signal.sosfilt(signal.butter(6, 270, "high", fs=SR, output="sos"), marbles)
    return (direct + gain_of(-6.5) * room(direct) + background())[None]


def record(dry, threshold_db=-16.5, cutoff_hz=15900):
    """Look-ahead limiting: peaks lose about half their excess in decibels; a low-pass filter follows."""
    peak_db = 20 * np.log10(-minimum_filter1d(-abs(dry[0]), size=41) + 1e-9)
    fall_db = np.arange(N) * 135.0 / SR  # the held peak falls 135 dB a second
    held_db = np.maximum.accumulate(peak_db + fall_db) - fall_db
    excess_db = np.maximum(held_db - threshold_db, 0)
    limited = dry / gain_of(0.51 * uniform_filter1d(excess_db, size=41))
    low_pass = signal.firwin(511, cutoff_hz, window=("kaiser", 9), fs=SR)
    return signal.oaconvolve(limited, low_pass[None], "same")


dry = scene()
out = record(dry)
transcribe(out)
```